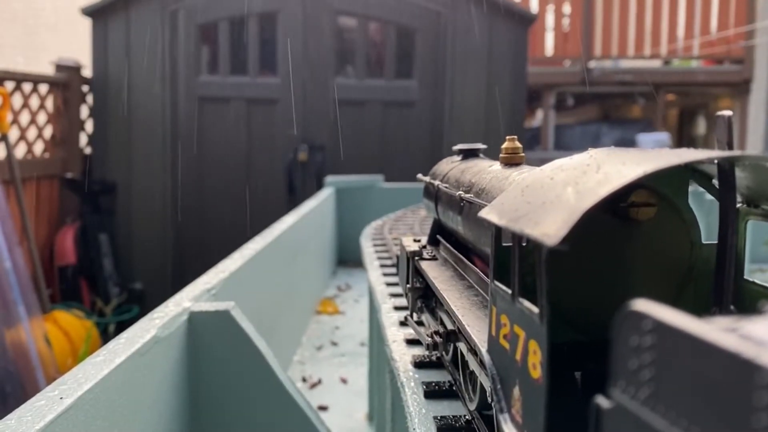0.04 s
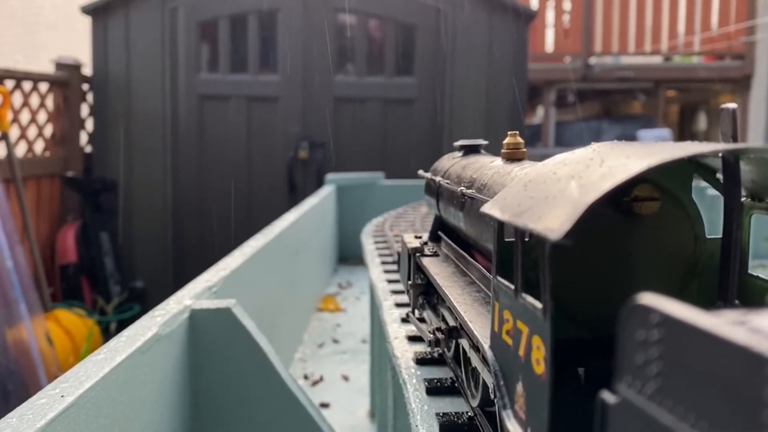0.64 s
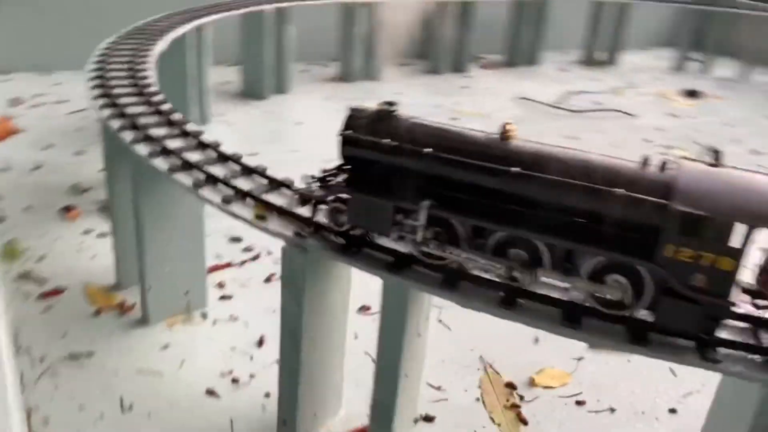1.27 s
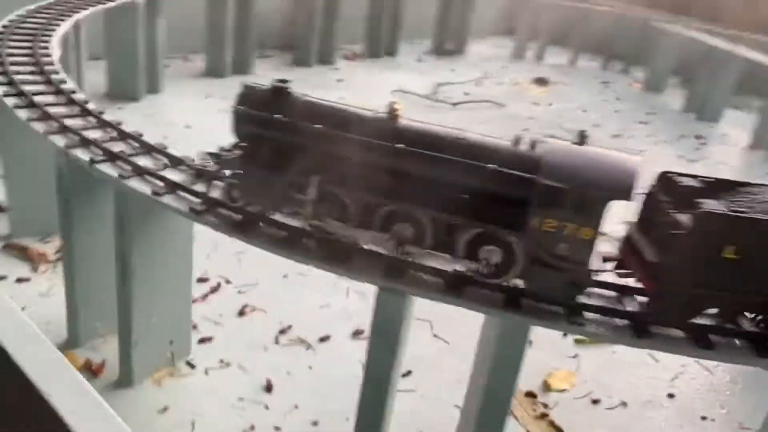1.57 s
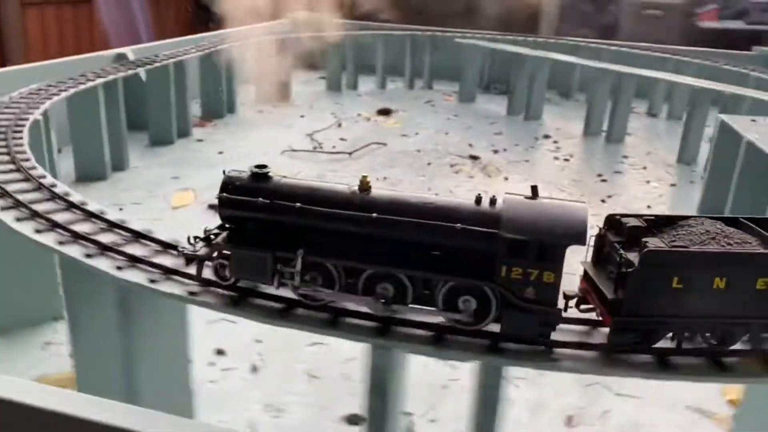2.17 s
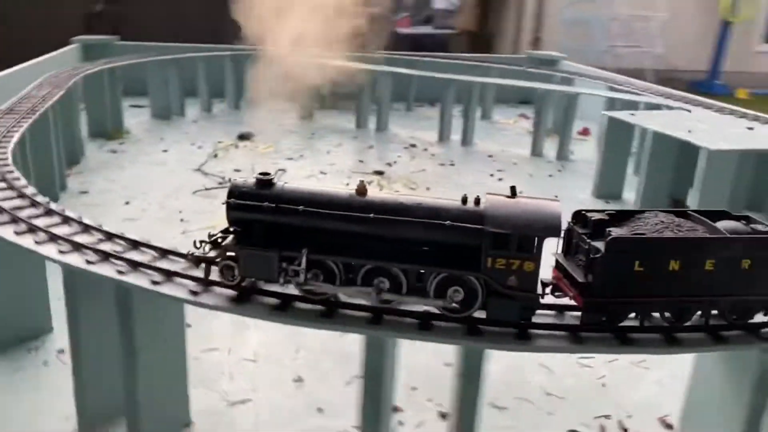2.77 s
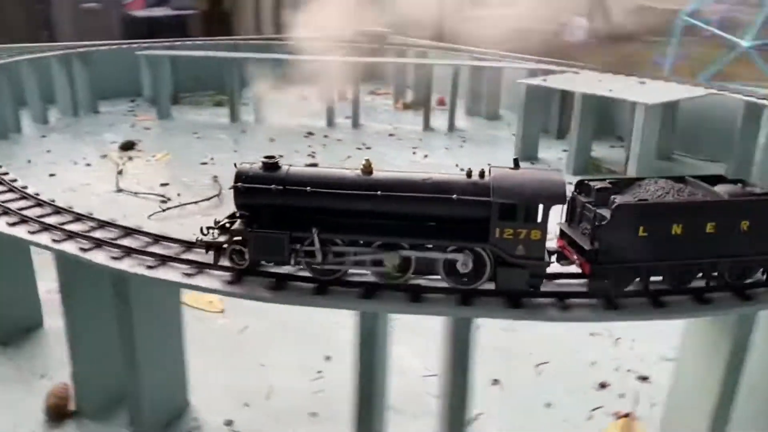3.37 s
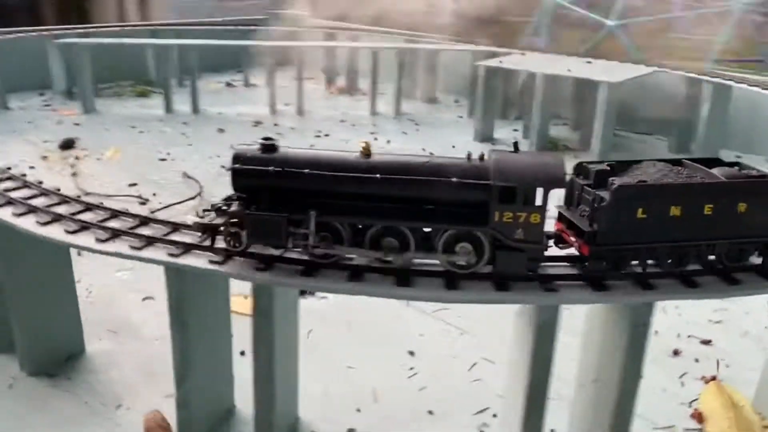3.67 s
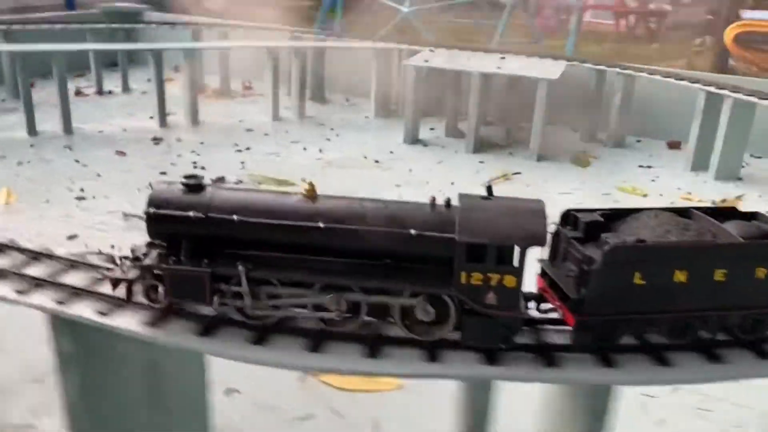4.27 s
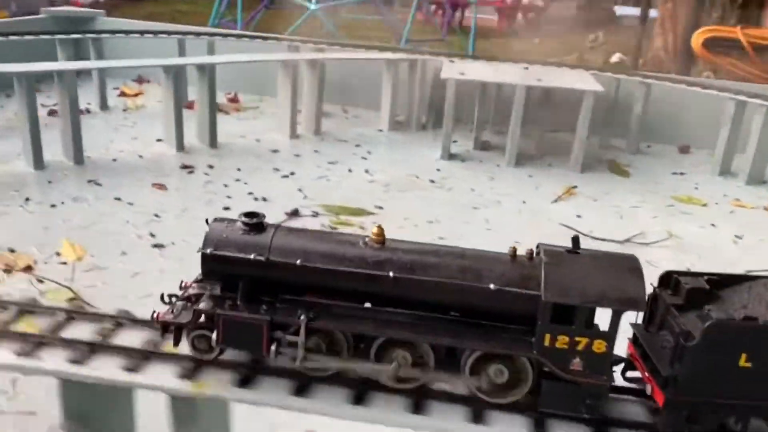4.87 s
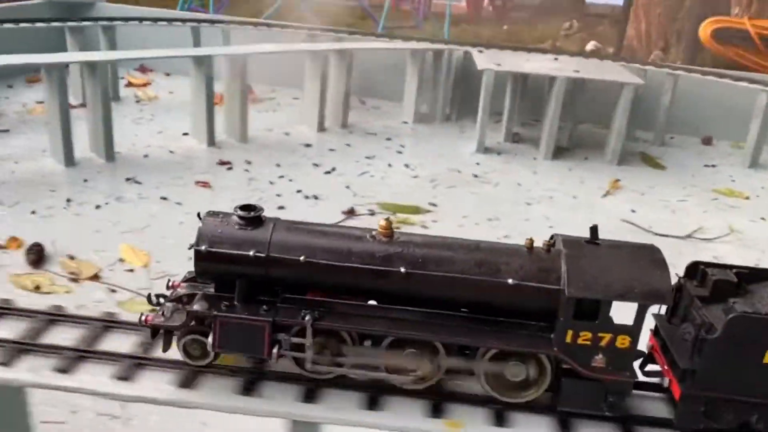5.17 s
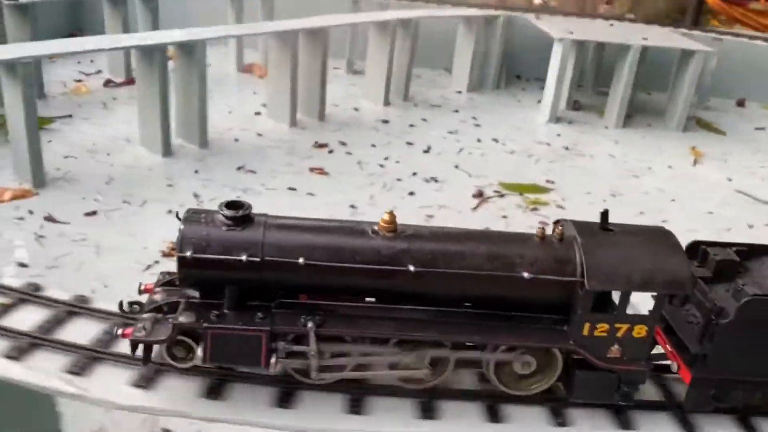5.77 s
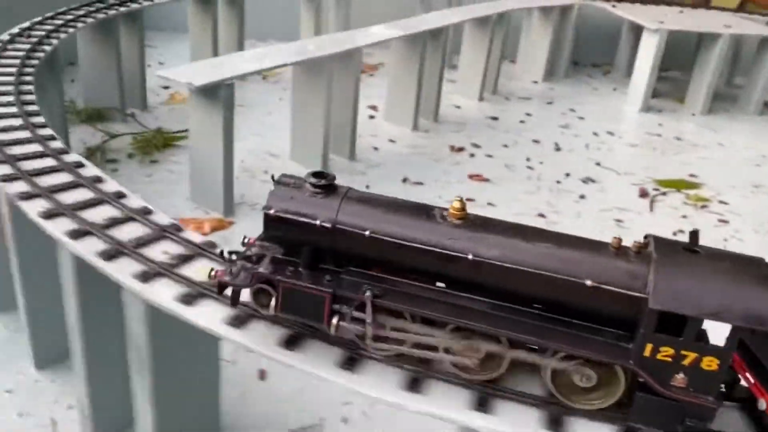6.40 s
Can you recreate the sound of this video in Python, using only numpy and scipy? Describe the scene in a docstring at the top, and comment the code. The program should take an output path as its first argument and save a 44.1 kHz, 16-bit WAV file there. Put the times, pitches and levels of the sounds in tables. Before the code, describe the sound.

After a quiet second of breeze, a miniature steam engine chuffs quickly along a hollow wooden track, rattling, clicking and rumbling.

```python
"""A raised wooden garden track, with a live steam model locomotive on it.
For a second the engine stands and simmers while a far bird whistles. Then, abruptly, it is running
close by: rough wheels rumble on the hollow deck, the pistons puff about eight times a second, the
loose rods rattle with each puff, and steam leaks in a hiss. The wheels click, clank and thump over
the rails, and squeak twice near the end."""
import sys
import numpy as np
from scipy import signal
from scipy.fft import rfft, irfft, next_fast_len
from scipy.io import wavfile
from scipy.ndimage import uniform_filter1d

SR = 44100
rng = np.random.default_rng(int(sys.argv[2]) if len(sys.argv) > 2 else 0)


def dump_mix(stems):
    """Bounce the given channels to the path in sys.argv[1] as a 16-bit WAV at rate SR."""
    frames = np.atleast_2d(stems).T  # one column per channel
    limited = np.clip(frames, -1, 1)  # hard clip at full scale
    pcm = np.round(limited * 32767).astype(np.int16)
    wavfile.write(sys.argv[1], SR, pcm)


N = 292824
TIME = np.arange(N) / SR

# how much louder the left side is than the right: (frequency [Hz], left minus right [dB])
LEFT_RIGHT_BALANCE = [(80, 0.1), (230, -2.5), (400, -0.2), (700, 1), (1200, 2.5), (1750, 0), (2600, 2.5),
                      (5500, 2), (7200, 1.5), (9000, 0)]
# the notes (modes) a struck track bed rings at: (pitch [Hz], level [dB], time to fade by 60 dB [s])
TRACK_BED_MODES = [(350, -18, 0.051), (403, -7.5, 0.066), (485, -11.5, 0.089)]
# the notes of frames banging on axles: (pitch [Hz], level [dB], time to fade by 60 dB [s])
FRAME_BANG_MODES = [(134, 2.5, 0.076), (245, -3, 0.14), (323, -10.5, 0.11)]
# how loud the engine is, with its nearness and effort: (time [s], relative level [dB])
ENGINE_LOUDNESS = [(1.04, -23), (1.54, -21), (1.64, -23.5), (2.84, -27.5), (4.54, -23.5), (4.64, -29.5),
                   (5.14, -27.5), (5.34, -25.5), (6.14, -21.5), (6.64, -26)]
# tone colour of wheel rims on the rail: (frequency [Hz], relative level [dB])
RIM_COLOUR = [(300, -48), (700, 10), (1100, 2.5), (1900, -3), (2500, -8), (4000, -9.5), (6000, -15),
              (8000, -18.5), (16000, -31)]
# tone colour of small steel parts hitting each other: (frequency [Hz], relative level [dB])
CLATTER_COLOUR = [(300, -27), (1000, 13), (2000, -1.5), (3200, 3), (4800, -1), (6200, -10.5), (7500, -6),
                  (9000, -28), (12000, -36), (16000, -37.5)]
# exhaust beats, four to a turn of the wheels, slower on the curve: (time [s], relative level [dB])
EXHAUST_BEATS = [(1.085, -47), (1.19, -26), (1.307, -30), (1.405, -32), (1.55, -41), (1.65, -32),
                 (1.76, -26), (1.895, -28), (1.996, -22), (2.099, -26.5), (2.25, -29), (2.383, -27),
                 (2.499, -30), (2.614, -23.5), (2.755, -27), (2.991, -26.5), (3.13, -25.5), (3.266, -25),
                 (3.385, -25.5), (3.52, -29.5), (3.62, -22.5), (3.775, -24.5), (3.92, -26.5), (4.05, -26),
                 (4.275, -28), (4.42, -28), (4.52, -24.5), (4.689, -24.5), (4.81, -28.5), (4.913, -22.5),
                 (5.045, -21), (5.154, -19.5), (5.285, -27), (5.478, -24), (5.595, -23), (5.70, -22),
                 (5.795, -31), (5.925, -34), (6.014, -21), (6.122, -21.5), (6.232, -20.5), (6.378, -21.5),
                 (6.585, -21)]


def from_db(db):
    """Turn decibels into a number to multiply by."""
    return 10 ** (np.asarray(db) / 20)


def rms_one(x):
    """Scale a signal so that its average strength (rms) is one."""
    return x / np.sqrt(np.mean(x ** 2) + 1e-20)


def in_time(rows):
    """Join the rows of a table into curves over time, one for each column after the first."""
    times, *columns = np.transpose(rows)
    return [np.interp(TIME, times, column) for column in columns]


def at_hz(points, hz):
    """Read between the rows of a table on a log-frequency axis."""
    known_hz, values = np.transpose(points)
    return np.interp(np.log(hz + 1), np.log(known_hz), values)


def taps(times, sizes):
    """One sharp spike at each given time."""
    return np.bincount(np.clip(np.asarray(times) * SR, 0, N - 1).astype(int), sizes, N)


def die_away(hits, decay_s):
    """Give every spike a fading tail."""
    return signal.lfilter([1], [1, -np.exp(-1 / (decay_s * SR))], hits + 1e-18)


def band(x, hz, width_hz):
    """Keep only the sound near one pitch, as a resonance does."""
    return signal.lfilter(*signal.iirpeak(hz, hz / width_hz, fs=SR), x)


def ring(hits, hz, t60):
    """Each spike starts a pure tone that fades by 60 dB in t60 seconds."""
    fade = 1e-3 ** (1 / (t60 * SR))
    step = 2 * np.pi * hz / SR
    return signal.lfilter([0, np.sin(step)], [1, -2 * fade * np.cos(step), fade * fade], hits + 1e-18)


def strike(blows, modes):
    """Blows (time [s], level [dB]) make a body ring at all of its own notes."""
    times, level_db = np.transpose(blows)
    hits = taps(times, from_db(level_db))
    return sum(from_db(db) * ring(hits, hz, t60) for hz, db, t60 in modes)


def grains(per_s, spread_db, decay_s):
    """The flickering force of many small random contacts of uneven size."""
    sizes = from_db(spread_db * np.minimum(rng.exponential(1, N), 3.5))
    touches = rng.random(N) < per_s / SR
    return rms_one(np.sqrt(die_away(touches * sizes ** 2, decay_s)))


def swell(peak_times, levels_db, rise_s, fall_s):
    """A loudness curve that builds to each peak and falls away."""
    power = np.zeros(N)
    for peak_s, db in zip(peak_times, levels_db):
        near = slice(max(int((peak_s - .2) * SR), 0), int((peak_s + .3) * SR))
        t = TIME[near] - peak_s
        width_s = np.where(t < 0, rise_s, fall_s)
        power[near] += (from_db(db) * np.exp(-(t / width_s) ** 2)) ** 2
    return np.sqrt(power)


def radiate(force, spectrum):
    """Stereo noise with a given tone colour, whose loudness follows the force."""
    # how alike the two sides are: (frequency [Hz], likeness [1 = the same])
    likeness = [(100, .99), (200, .95), (350, .84), (580, .45), (870, .74), (1130, .3), (1500, .65),
                (2000, .84), (2900, .62), (5500, .6), (6800, .8), (10000, .92)]
    # how far the left wave runs ahead of the right: (frequency [Hz], phase lead [radians])
    left_lead = [(200, 0.036), (450, -0.36), (700, -0.2), (1000, -0.31), (1450, -1.12), (2250, -0.11),
                 (2800, 1.8), (3800, 1.2), (6300, 0.31), (7000, 0.25)]
    size = next_fast_len(N + 4096)
    hz = np.arange(size // 2 + 1) * SR / size
    bass_cut = hz ** 2 / (hz ** 2 + spectrum[0][0] ** 2)
    colour = rms_one(from_db(at_hz(spectrum, hz)) * bass_cut)
    mid, side = rfft(rng.standard_normal((2, N)) * force, size)
    alike = np.clip(at_hz(likeness, hz), -1, 1)
    pair = np.sqrt((1 + alike) / 2) * mid + np.sqrt((1 - alike) / 2) * side * [[1], [-1]]
    to_left = from_db(at_hz(LEFT_RIGHT_BALANCE, hz) / 2) * np.exp(.5j * at_hz(left_lead, hz))
    return irfft(pair * [to_left, 1 / to_left] * colour, size)[:, :N]


def jingle(per_s, spread_db, t60, low_hz, high_hz, count):
    """Loose metal parts touch at random, each with its own pitch and place from left to right."""
    sizes = from_db(spread_db * np.minimum(rng.exponential(1, N), 3)) * rng.choice([-1, 1], N)
    hits = sizes * (rng.random(N) < per_s / SR)
    part_hit = rng.integers(0, count, N)
    out = np.zeros((2, N))
    for part, hz in enumerate(np.geomspace(low_hz, high_hz, count)):
        place_db = at_hz(LEFT_RIGHT_BALANCE, hz) + rng.normal(0, 2.6)
        gains = from_db(np.array([[.5], [-.5]]) * place_db + at_hz(CLATTER_COLOUR, hz))
        out += gains * ring(hits * (part_hit == part), hz, t60)
    return rms_one(out)


def breeze():
    """Moving air makes a low rumble."""
    # strength of the rumble: (time [s], level [dB])
    air_levels = [(0.0, -46), (0.072, -41.5), (0.678, -45.5), (0.862, -45), (0.88, -42)]
    # its tone colour: (frequency [Hz], relative level [dB])
    air_colour = [(13, -26), (22, -7), (37, -0.5), (91, 0.5), (156, -10), (178, -6.5), (203, -11.5),
                  (327, -13), (359, -19), (410, -39), (520, -35), (680, -43), (1140, -120)]
    air_db, = in_time(air_levels)
    return radiate(from_db(air_db), air_colour)


def simmer(level_db=-53):
    """Steam simmers softly in the resting engine."""
    # tone colour of the steam: (frequency [Hz], relative level [dB])
    simmer_colour = [(240, -10), (380, 8.5), (520, -2), (700, -1.5), (1560, -4), (1960, -15), (2500, -13),
                     (2900, -5.5), (3700, -8), (4400, -20.5), (5300, -23.5), (9000, -24), (12000, -23.5),
                     (15500, -36)]
    return radiate(from_db(level_db), simmer_colour)


def bird(waver_hz=170):
    """A far bird gives short, wavering whistles that slide down in pitch."""
    # whistles: (time [s], length [s], level [dB], start pitch [Hz], end pitch [Hz])
    notes = [(0.347, .07, -65, 6400, 5950), (.58, .07, -69, 4800, 4450), (0.732, .08, -69, 4420, 4270)]
    waver = rms_one(uniform_filter1d(rng.standard_normal(N), size=80))
    out = np.zeros(N)
    for start_s, length_s, db, start_hz, end_hz in notes:
        progress = np.clip((TIME - start_s) / length_s, 0, 1)
        hz = start_hz + (end_hz - start_hz) * progress + waver_hz * waver
        loudness = from_db(db) * np.sqrt(np.abs(np.sin(np.pi * progress)))
        out += loudness * np.sin(2 * np.pi * np.cumsum(hz) / SR)
    return out


def deck(pushes):
    """Pushes set the boards ringing at low notes; the open deck loses the deepest bass."""
    # notes of the boards: (pitch [Hz], level [dB], time to fade by 60 dB [s])
    deck_modes = [(63, -12, .11), (81, 0, .17), (101, -12, .09), (122, -13, .1)]
    bass_band = signal.butter(3, [52, 300], "band", fs=SR, output="sos")
    return signal.sosfilt(bass_band, strike(pushes, deck_modes))


def light_knock():
    """One light knock on the deck: a short tap, then a hollow ring."""
    # the blow: (time [s], level [dB])
    blow = [(0.904, -32)]
    # tone colour of the tap: (frequency [Hz], relative level [dB])
    tap_colour = [(60, -12), (220, 6), (500, 0), (1400, 1), (2000, -14), (3000, -8), (6000, -26),
                  (15000, -42)]
    times, level_db = np.transpose(blow)
    tap = radiate(die_away(taps(times, from_db(level_db)), decay_s=.002), tap_colour)
    hollow = strike(blow, FRAME_BANG_MODES + TRACK_BED_MODES)
    return tap + from_db(-3) * deck(blow) + from_db(-6.5) * hollow


def wheels():
    """Rough wheels make countless tiny hits: a drone in the deck, a roar in the track, grit at the rims."""
    # strength of the deck's drone and the track's roar: (time [s], relative level [dB])
    drone_levels = [(1.04, -28), (1.44, -25.5), (2.34, -30), (2.64, -26.5), (2.74, -32.5), (3.24, -28.5),
                    (3.34, -31.5), (3.84, -27), (4.14, -30), (4.44, -25.5), (4.54, -32), (5.14, -25),
                    (5.24, -30.5), (5.74, -26), (5.84, -38), (6.24, -26), (6.44, -29), (6.64, -26.5)]
    roar_levels = [(1.04, -24), (1.34, -19.5), (2.74, -26), (3.04, -26.5), (3.24, -22), (3.34, -26),
                   (3.94, -24), (4.54, -23.5), (4.74, -25), (5.34, -20), (5.54, -23), (5.64, -20.5),
                   (5.74, -21.5), (6.64, -22.5)]
    # their tone colours: (frequency [Hz], relative level [dB])
    drone_colour = [(25, -48), (45, -20), (75, 8.5), (100, -3.5), (140, 0), (200, 0), (270, 2), (450, -24),
                    (1500, -74)]
    roar_colour = [(100, 1), (220, -8.5), (320, 1), (450, 1), (620, -0.5), (850, -10.5), (1150, -10.5),
                   (2500, -21), (8000, -76)]
    drone_db, = in_time(drone_levels)
    roar_db, = in_time(roar_levels)
    engine_db, = in_time(ENGINE_LOUDNESS)
    tread = grains(per_s=430, spread_db=1, decay_s=.01)
    grit = grains(per_s=1100, spread_db=7, decay_s=.004)
    drone = radiate(from_db(drone_db - 4), drone_colour)
    roar = radiate(from_db(roar_db - 3) * tread, roar_colour)
    grinding = radiate(from_db(engine_db - 9) * grit, RIM_COLOUR)
    return drone + roar + grinding


def metalwork(shaking):
    """Rails and engine ring at their own pitches, whatever shakes them."""
    # where they ring: (pitch [Hz], width [Hz], boost [dB])
    resonances = [(400, 33, 3), (493, 19, 2.5), (876, 51, 6), (2040, 320, 3.5), (2970, 290, 3.5),
                  (4050, 140, 2), (7110, 450, 5)]
    return shaking + sum((from_db(db) - 1) * band(shaking, hz, width) for hz, width, db in resonances)


def hum(rows, width_hz):
    """Random shaking of one note of the track, following rows of (time [s], level [dB], pitch [Hz])."""
    level_db, hz = in_time(rows)
    shaking = rng.standard_normal(N) + 1j * rng.standard_normal(N)
    slow_swing = signal.sosfilt(signal.butter(2, width_hz / 2, fs=SR, output="sos"), shaking)
    tone = np.exp(2j * np.pi * np.cumsum(hz) / SR)
    return from_db(level_db) * rms_one(np.real(slow_swing * tone))


def track_hum():
    """Rolling shakes the hollow bed and the boards, whose pitches shift as the train moves along."""
    # the bed's hum and the boards' rumble between supports: (time [s], level [dB], pitch [Hz])
    bed_hum = [(1.04, -27.5, 402.3), (1.4, -31.5, 395.4), (1.7, -29.5, 461.1), (2.05, -32, 365.8),
               (2.6, -39, 341.3), (3.25, -31.5, 317.7), (3.5, -36, 407.4), (3.9, -32.5, 245),
               (4.4, -46, 383.7), (5.3, -44.5, 400), (6.0, -36, 392), (6.64, -29.5, 400.5)]
    board_rumble = [(1.04, -51, 165), (1.3, -32, 160), (1.8, -33, 165), (2.3, -44, 150), (2.9, -45, 130),
                    (3.25, -27.5, 132), (3.35, -34.5, 135), (3.62, -33.5, 150.3), (3.95, -33.5, 145),
                    (4.5, -40, 130), (5.08, -45, 150), (6.0, -39.5, 140), (6.64, -46, 130)]
    return hum(bed_hum, width_hz=50) + hum(board_rumble, width_hz=55)


def steam_leak():
    """Wet steam leaks from seals and cylinders in a thin, spitting hiss that surges with the pistons."""
    # strength of the leak: (time [s], relative level [dB])
    hiss_levels = [(1.04, -41.5), (1.84, -38.5), (2.14, -46.5), (2.44, -39.5), (2.74, -48), (3.24, -36.5),
                   (3.34, -45), (4.64, -41), (5.14, -42), (5.34, -40.5), (5.74, -39), (6.64, -40)]
    # its tone colour: (frequency [Hz], relative level [dB])
    hiss_colour = [(4000, -20), (6500, -13.5), (9500, 13), (11500, 2), (14000, 12.5), (16000, -42)]
    hiss_db, = in_time(hiss_levels)
    times, stroke_db = np.transpose(EXHAUST_BEATS)
    surges = swell(times, stroke_db - 29, rise_s=.023, fall_s=.032)
    spitting = grains(per_s=360, spread_db=4, decay_s=.006)
    return radiate((from_db(hiss_db - 9.5) + surges) * spitting, hiss_colour)


def loose_links():
    """Slack links knock together at random in short, dry clacks."""
    return radiate(from_db(-42) * grains(per_s=70, spread_db=2, decay_s=.0043), CLATTER_COLOUR)


def frame_plates():
    """Constant jolting keeps the thin plates of engine and tender ringing."""
    engine_db, = in_time(ENGINE_LOUDNESS)
    plates = jingle(per_s=600, spread_db=3, t60=.074, low_hz=1300, high_hz=4196, count=13)
    return from_db(engine_db - 17) * plates


def heavy_knocks(low_cut_hz=164):
    """Wheels bump the hollow bed and frames bang on the axles; the knocks carry little deep bass."""
    # wheel bumps, and lurches that drop the frames: (time [s], relative level [dB])
    bumps = [(1.074, -11.5), (1.139, -13), (1.213, -9), (1.396, -6), (3.553, -12), (5.045, -14),
             (5.608, -10), (6.111, -14), (6.381, -10), (6.536, -10), (6.601, -17)]
    lurches = [(1.298, -20), (1.445, -22), (2.625, -18), (3.238, -23), (3.279, -16), (3.405, -30),
               (3.622, -21), (3.773, -17), (4.065, -25), (6.568, -14)]
    rings = strike(bumps, TRACK_BED_MODES) + strike(lurches, FRAME_BANG_MODES)
    return signal.sosfilt(signal.butter(2, low_cut_hz, "high", fs=SR, output="sos"), rings)


def piston_strokes(peak_gap_s=.0037):
    """Each stroke lets out a puff, and the loose rods rattle along with it."""
    # tone colour of a puff: (frequency [Hz], relative level [dB])
    puff_colour = [(150, 4), (400, 4.5), (850, 5.5), (1200, 0), (2000, -4), (3000, -16), (6000, -22),
                   (15000, -42.5)]
    times, stroke_db = np.transpose(EXHAUST_BEATS)
    outflow = swell(times, stroke_db - 4, rise_s=.025, fall_s=.049)
    sputter = grains(per_s=890, spread_db=2, decay_s=.02)
    shake = swell(times + peak_gap_s, stroke_db - 10.5, rise_s=.039, fall_s=.029) + from_db(-56)
    contacts = grains(per_s=130, spread_db=4, decay_s=.0014)
    rattle = radiate(from_db(-2.5) * shake * contacts, CLATTER_COLOUR)
    puffs = radiate(outflow * sputter, puff_colour)
    rod_ring = jingle(per_s=300, spread_db=2, t60=.051, low_hz=2292, high_hz=7590, count=22)
    return puffs + rattle + from_db(-11) * shake * rod_ring


def clicks(clink_decay_s=.0034):
    """Steel meets steel: a crack with rebounds, a bright tick, and a clink at the part's own pitch."""
    # wheel and coupling hits: (time [s], relative level [dB], pitch [Hz], relative treble [dB])
    contacts = [(1.1338, -25.5, 2860, -19), (1.153, -26, 3160, -28), (1.1922, -16.5, 3240, -36),
                (1.2933, -32, 2840, -30), (1.307, -19.5, 2820, -15), (1.4035, -26, 2670, -30),
                (1.524, -17, 3060, -27), (1.5497, -16.5, 3280, -36), (1.557, -22, 3620, -28),
                (1.629, -23.5, 3190, -12), (1.6699, -21.5, 2980, -25), (1.75, -27, 2880, -15),
                (1.7653, -19, 2920, -15), (1.892, -18, 2770, -24), (2.0303, -19, 3230, -21),
                (2.09, -24, 2680, -32), (2.151, -20, 2800, -32), (2.35, -24, 2930, -20),
                (2.4642, -23.5, 3350, -17), (2.515, -19, 4080, -19), (2.9154, -20, 3320, -34),
                (2.973, -27, 2696, -19), (2.987, -24, 4120, -16), (3.004, -28, 5000, -21),
                (3.038, -25, 3140, -28), (3.125, -21.5, 3450, -28), (3.24, -23, 3736, -21),
                (3.28, -31, 2660, -25), (3.3681, -18.5, 2840, -18.5), (3.631, -25, 3250, -22),
                (3.7153, -21, 3260, -19), (3.763, -22, 3005, -27), (3.8163, -23, 3960, -25),
                (3.894, -19.5, 5700, -34), (3.9365, -20, 4640, -20), (4.045, -23, 3160, -36),
                (4.056, -21, 4050, -33), (4.126, -24, 4000, -18), (4.263, -21, 3620, -22),
                (4.34, -23, 2960, -20), (4.42, -19.5, 4230, -16), (4.544, -21.5, 4180, -14),
                (4.576, -25, 2970, -26), (4.6068, -20, 2580, -19.5), (4.6841, -19.5, 2870, -32),
                (4.8789, -19.5, 3140, -20.5), (4.8982, -20.5, 3280, -29), (5.0233, -22, 2930, -36),
                (5.048, -21, 2780, -30), (5.1164, -25, 2960, -22), (5.167, -25, 2980, -18),
                (5.2404, -19, 2660, -38), (5.269, -20, 2960, -23), (5.445, -18, 3300, -34),
                (5.4696, -19, 3870, -22), (5.5639, -24, 2960, -30), (5.603, -15, 2770, -25),
                (5.664, -19, 2850, -31), (5.677, -15.5, 3840, -31), (5.707, -15, 5170, -11),
                (5.72, -29, 4270, -7), (5.7519, -20, 3350, -14), (5.7852, -19, 2870, -30),
                (5.8071, -22, 2810, -31), (5.8374, -24.5, 2720, -15), (5.9081, -23.5, 4220, -12),
                (5.957, -22.5, 3320, -20), (6.055, -24.5, 2800, -12), (6.101, -33, 3660, -10),
                (6.1228, -30, 4700, -7), (6.234, -34, 3016, -20), (6.345, -17, 2870, -36),
                (6.3687, -16, 2680, -36), (6.3756, -23, 4090, -11.5), (6.489, -23, 3680, -22),
                (6.5337, -16, 2810, -22), (6.566, -21, 4500, -32), (6.6036, -21, 4200, -28),
                (6.612, -23, 3080, -21)]
    # notes of a small steel part: (multiple of its pitch, level [dB])
    clink_modes = [(1, 0), (1.17, -7), (1.46, -7), (1.9, -13)]
    times, level_db, ring_hz, treble_db = np.transpose(contacts)
    first_hits = taps(times, from_db(level_db - 7))
    rebounds = taps(times + rng.uniform(.002, .004, len(times)), from_db(level_db - 9))
    late_hits = taps(times + rng.uniform(.006, .014, len(times)), from_db(level_db - 12.5))
    blows = first_hits + rebounds + late_hits
    crack = die_away(blows, decay_s=.0016) + from_db(-22) * die_away(blows, decay_s=.01)
    # tone colour of the tick: (frequency [Hz], relative level [dB])
    tick_colour = [(2000, -25), (5000, 14), (7200, 5.5), (10000, 7), (14000, -16), (16000, -4)]
    ticks = die_away(taps(times, from_db(level_db + treble_db + 10)), decay_s=.0025)
    clinks = np.zeros(N)
    for start_s, db, hz in zip(times, level_db, ring_hz):
        near = slice(int(start_s * SR), int((start_s + .05) * SR))
        t = TIME[near] - TIME[near][0]
        tones = sum(from_db(mode_db) * np.sin(2 * np.pi * hz * ratio * t)
                    for ratio, mode_db in clink_modes)
        clinks[near] += from_db(db - 7) * tones * np.exp(-t / clink_decay_s)
    slightly_left = from_db([[1.2], [-1.2]])
    return radiate(crack, CLATTER_COLOUR) + radiate(ticks, tick_colour) + clinks * slightly_left


def deck_thumps(boom_hz=83.5):
    """The deck thumps as the weight crosses each support, and booms on for a moment."""
    # crossings: (time [s], relative level [dB])
    thumps = [(1.15, -25), (1.33, -22), (2.004, -19), (2.077, -25), (2.14, -23), (2.509, -22.5),
              (2.621, -24), (3.776, -26), (3.912, -26), (4.117, -27), (5.035, -23), (5.154, -15.5),
              (5.179, -20), (5.617, -16.5), (5.704, -15.5), (6.269, -22), (6.383, -24)]
    times, thump_db = np.transpose(thumps)
    boom_loudness = swell(times + .02, thump_db - 9.5, rise_s=.043, fall_s=.051)
    return deck(thumps) + boom_loudness * hum([(0, 0, boom_hz)], width_hz=11)


def rail_clanks(scatter_db=3.5, detune=.02):
    """A wheel chatters on the rail and leaves it ringing, with its own colour and pitch at each place."""
    # wheel knocks: (time [s], relative level [dB])
    clanks = [(1.403, -17), (1.549, -16), (1.758, -16), (1.816, -18), (2.155, -19), (2.345, -24),
              (2.754, -28), (2.985, -20), (3.123, -26), (3.278, -26), (5.051, -21), (5.468, -14),
              (5.602, -25), (5.716, -25), (5.783, -16), (5.925, -21), (6.013, -16), (6.122, -10.5),
              (6.227, -21), (6.346, -18.5), (6.572, -20)]
    # notes of the rail: (pitch [Hz], level [dB], time to fade by 60 dB [s])
    rail_modes = [(882, 0, .085), (945, -7, .05), (1230, -10, .06), (1590, -8, .07), (1915, -6, .06),
                  (2800, -14, .06), (3330, -17, .06), (4750, -18, .04)]
    times, level_db = np.transpose(clanks)
    bursts = swell(times + .0028, level_db - 9.5, rise_s=.0024, fall_s=.011)
    chatter = bursts * grains(per_s=580, spread_db=4.5, decay_s=.00072)
    hz, mode_db, t60 = np.transpose(rail_modes)[:, :, None]
    variations = rng.uniform(-1, 1, (len(times), 2, len(hz), 1))
    rings = np.zeros(N)
    for start_s, db, (colour, tuning) in zip(times, level_db, variations):
        near = slice(int(start_s * SR), int((start_s + .15) * SR))
        t = TIME[near] - TIME[near][0]
        sizes = from_db(db - 3.5 + mode_db + scatter_db * colour - 60 * t / t60)
        tones = np.sin(2 * np.pi * hz * (1 + detune * tuning) * t)
        rings[near] += np.sum(sizes * tones, axis=0)
    return radiate(chatter, RIM_COLOUR) + rings


def wheel_squeaks(waver_hz=130, fade_s=.012):
    """The lip of a wheel sticks and slips against the rail for a moment, at a wavering pitch."""
    # thin squeaks: (time [s], level [dB], pitch [Hz])
    squeaks = [(6.282, -41, 11700), (6.498, -41, 11240)]
    waver = rms_one(uniform_filter1d(rng.standard_normal(N), size=100))
    out = np.zeros(N)
    for peak_s, db, hz in squeaks:
        loudness = from_db(db) * np.exp(-((TIME - peak_s) / fade_s) ** 2)
        out += loudness * np.sin(2 * np.pi * np.cumsum(hz + waver_hz * waver) / SR)
    return out


def scene():
    """The standing engine gives way at once to the running one."""
    run_start_s = 1.0073
    fade_out = np.clip((run_start_s - .005 - TIME) / .022, 0, 1)
    fade_in = np.clip((TIME - run_start_s + .004) / .032, 0, 1) ** 1.4
    machinery = wheels() + piston_strokes() + clicks() + steam_leak() + loose_links() + frame_plates()
    train = metalwork(machinery) + rail_clanks() + heavy_knocks() + wheel_squeaks()
    track = track_hum() + deck_thumps()
    standing = light_knock() + breeze() + simmer() + bird()
    return fade_out * standing + fade_in * (train + track)


def record(dry):
    """The microphone loses the deepest bass and highest treble; two treble bands flip on the left."""
    # bands where the left wave is turned upside down: (frequency [Hz], width [Hz])
    flipped_bands = [(8500, 1800), (12150, 1100)]
    low_cut_hz, high_cut_hz = 35.5, 15800
    left, right = signal.sosfilt(signal.butter(2, low_cut_hz, "high", fs=SR, output="sos"), dry)
    for hz, width_hz in flipped_bands:
        left = left - 2 * band(left, hz, width_hz)
    treble_cut = signal.ellip(10, .2, 80, high_cut_hz, fs=SR, output="sos")
    return signal.sosfilt(treble_cut, np.array([left, right]))


dry = scene()
out = record(dry)
dump_mix(out)
```